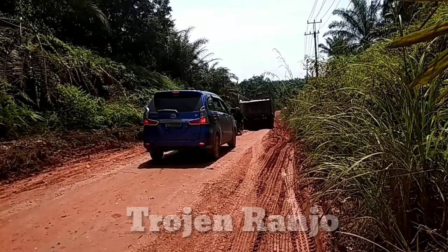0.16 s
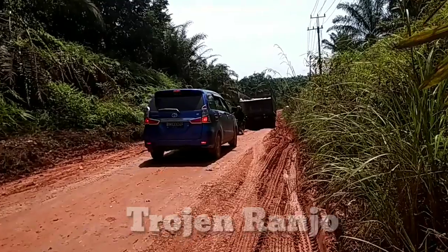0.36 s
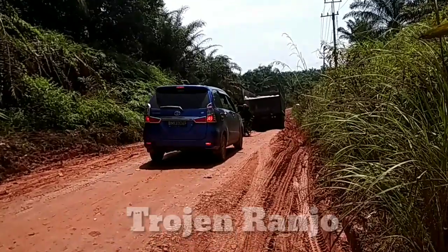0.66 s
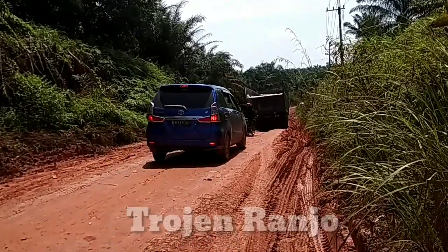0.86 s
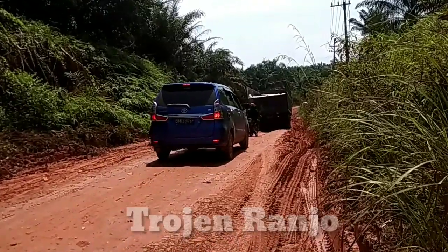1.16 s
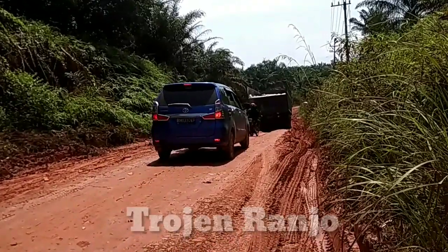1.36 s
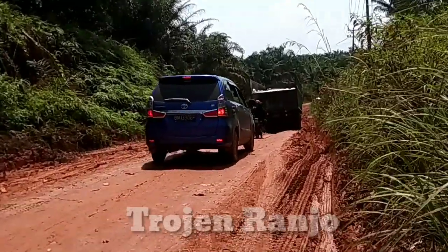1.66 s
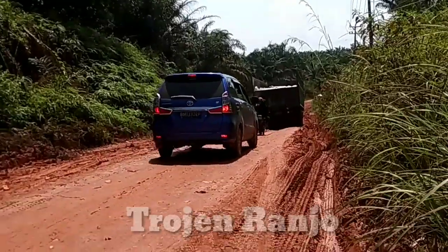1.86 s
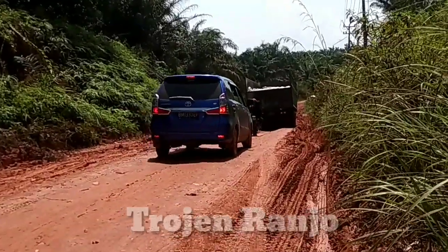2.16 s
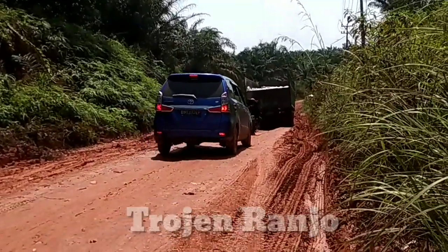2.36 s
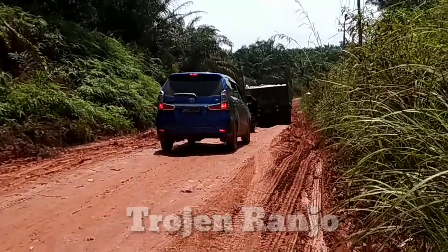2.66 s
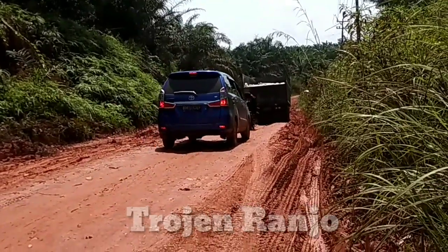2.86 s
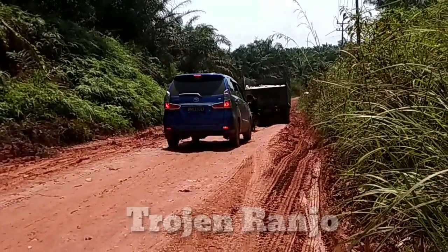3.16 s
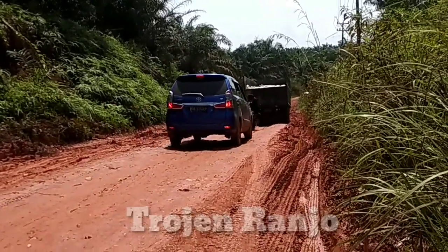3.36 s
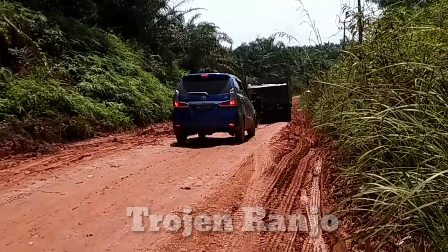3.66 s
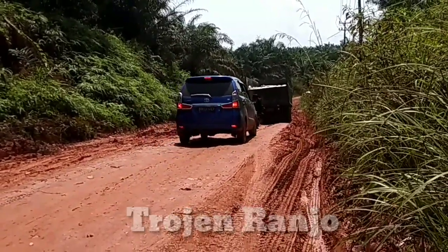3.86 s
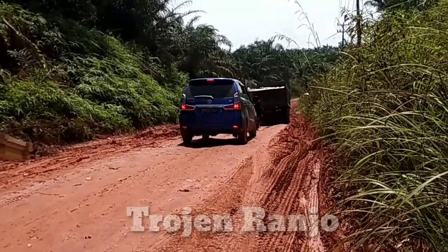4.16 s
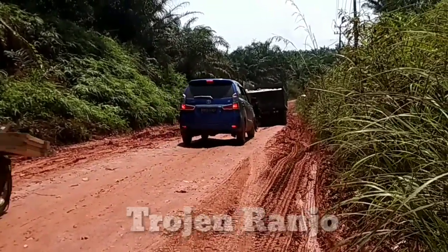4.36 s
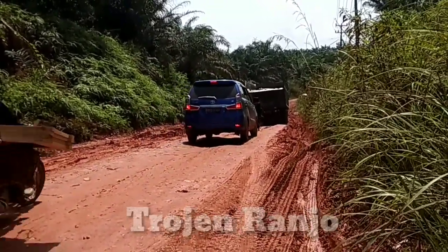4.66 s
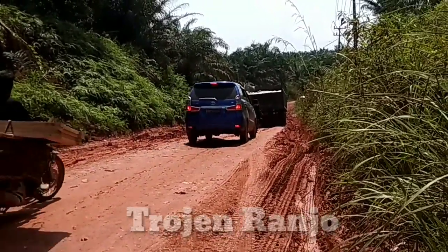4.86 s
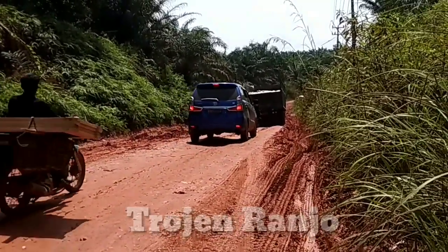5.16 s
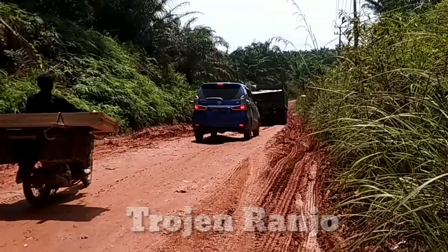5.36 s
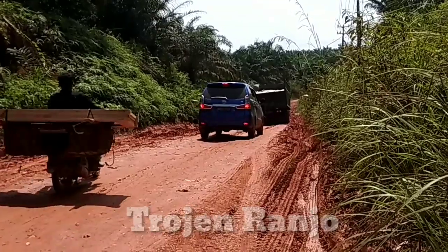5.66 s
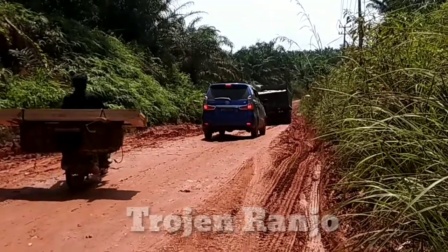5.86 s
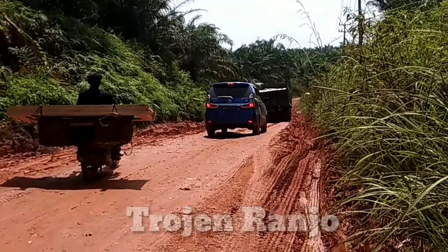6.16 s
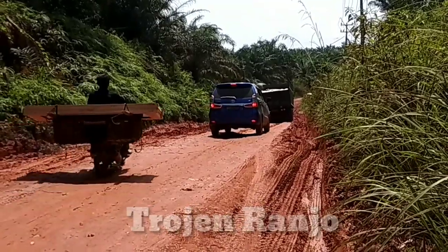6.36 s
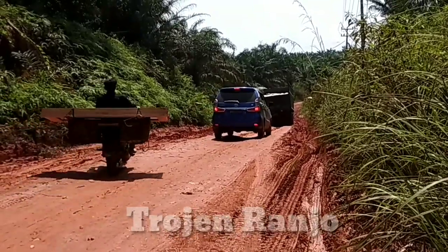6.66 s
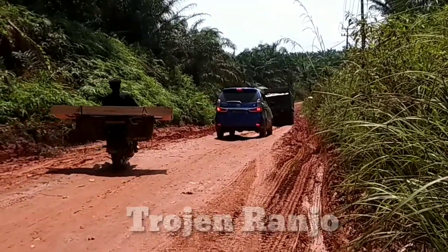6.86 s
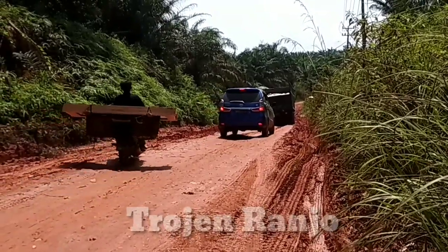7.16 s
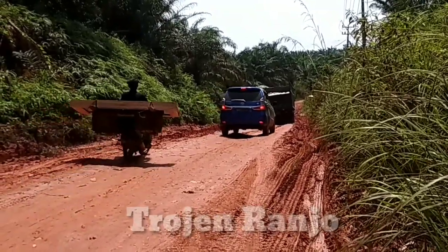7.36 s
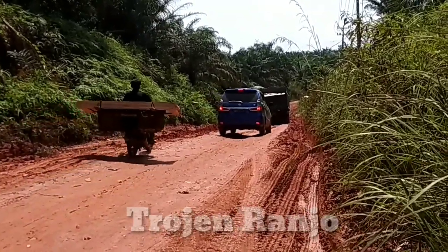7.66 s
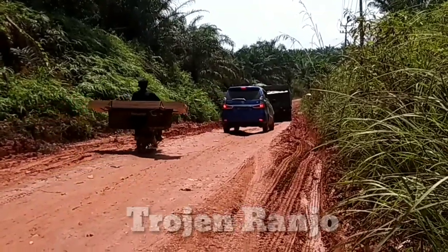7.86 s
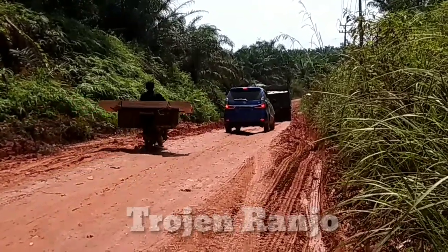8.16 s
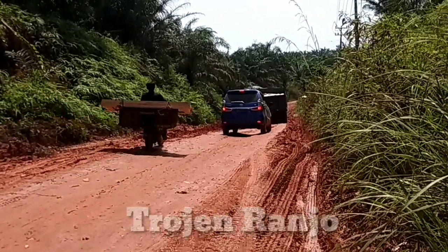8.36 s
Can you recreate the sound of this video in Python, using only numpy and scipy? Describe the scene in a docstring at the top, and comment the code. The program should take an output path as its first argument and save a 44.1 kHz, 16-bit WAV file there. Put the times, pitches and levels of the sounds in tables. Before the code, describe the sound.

Close stereo pickup beside an open dirt track: a lumpy, low-revving motorbike creeps by, slightly to the right at first, then straight ahead. Dry chain hiss, mechanical clatter, short creaks and hoarse squeaks from its bouncing load are loudest in the first seconds. Two quick throttle bursts thud and boom midway, then the idle drops and recedes with fainter scrapes. Steady low truck drone, faint engine whines and gentle wind buffeting lie beneath.

```python
"""Loaded motorbike on a dirt road

A single-cylinder bike crawls past, from beside the microphones to straight ahead, behind a car and a truck.
Firing pulses ring its silencer, with a few twists of the throttle; noise bursts and gliding tones are the
load rubbing and squeaking as it bounces. Noise grains crackle as grit under the tyres.
Wavering sines drone and whine as the engines ahead, over filtered-noise traffic rumble and breeze."""
import sys
import numpy as np
from scipy import signal
from scipy.fft import rfft, irfft, next_fast_len
from scipy.io import wavfile
from scipy.ndimage import uniform_filter1d, map_coordinates

SR = 44100
rng = np.random.default_rng(int(sys.argv[2]) if len(sys.argv) > 2 else 0)


def wrap_up_sound(samples):
    """Save the sound to the file named by the first command line argument, as 16-bit audio."""
    columns = np.atleast_2d(samples).T
    # keep every value between -1 and 1, then stretch to whole-number steps
    tamed = np.clip(columns, -1, 1)
    steps = np.round(tamed * 32767).astype(np.int16)
    wavfile.write(sys.argv[1], SR, steps)


N = 375291
TIME = np.arange(N) / SR

# bike engine speed: time_s, firings_per_s
FIRING_RATE = [(0, 17.85), (.5, 14.32), (1.4, 12.8), (2.5, 13.06), (3.1, 17.01), (3.35, 15.38),
               (3.6, 16.89), (3.84, 15.95), (4.01, 22.91), (4.2, 18.21), (4.45, 14.67), (4.85, 11.65),
               (5.2, 13.21), (5.41, 19.5), (5.7, 15), (6.3, 12.3), (8.5, 11.85)]


def amp(db):
    """Decibels to gain."""
    return 10 ** (np.asarray(db) / 20)


def unit(x):
    """Scales to rms 1."""
    return x / np.sqrt(np.mean(x ** 2) + 1e-20)


def curve(rows):
    """Interpolates a time table at every sample."""
    return np.interp(TIME, *np.transpose(rows))


def read(points, hz):
    """Interpolates a dB spectrum on a log-frequency axis."""
    f, db = np.transpose(points)
    return np.interp(np.log(hz + 1), np.log(f + 1), db)


def bins(size):
    """Bin frequencies of a real spectrum of that many samples."""
    return np.fft.rfftfreq(size, 1 / SR)


def colour(x, points):
    """Zero-phase filter by a dB spectrum."""
    size = next_fast_len(N, real=True)
    return irfft(rfft(x, size) * amp(read(points, bins(size))), size)[..., :N]


def ring(x, points, size=16384):
    """Causal minimum-phase filter: each pulse rings on with this spectrum."""
    log_gain = np.log(amp(read(points, abs(np.fft.fftfreq(size, 1 / SR)))))
    response = np.fft.ifft(np.exp(signal.hilbert(log_gain).conj())).real
    return signal.oaconvolve(x, response[:size // 2])[:N]


def resonate(x, hz, width_hz):
    """Resonance of peak gain 1 that follows a frequency curve."""
    turn = np.exp(2j * np.pi * np.cumsum(hz) / SR)
    r = np.exp(-np.pi * width_hz / SR)
    return 2 * (turn * signal.lfilter([1 - r], [1, -r], x / turn + 1e-18)).real


def wander(knots_per_s):
    """Random curve of rms 1, linear between knots."""
    return unit(np.interp(TIME * knots_per_s, np.arange(4096), rng.standard_normal(4096)))


def add(mix, s, sound):
    """Mixes a sound in at a time in seconds."""
    part = mix[max(round(s * SR), 0):][:len(sound)]
    part += sound[:len(part)]


def spreading_db():
    """Spreading gain along a straight path, 0 dB at the closest point."""
    closest_s, closest_m, speed_m_per_s = 1.61, 2.9, 2.014
    return -20 * np.log10(np.hypot(1, speed_m_per_s * (TIME - closest_s) / closest_m))


def stages():
    """Shares of the bike's front, side and back in what is heard; the side takes whatever front and back leave."""
    coming = curve([(1.9, 0.9), (3.1, 0.26)])
    going = curve([(4.1, 0.18), (4.9, 0.68)])
    return coming, np.clip(1 - coming - going, 0, 1), going


def throttle():
    """Opening from 0 to 1: each twist rises, is held and dies away."""
    # twists: start_s, held_s, opening_0_to_1
    twists = [(0, 0.17, 0.2), (2.3, 0.75, 0.22), (3.551, 0.16, 0.72), (3.85, 0.27, 0.83), (4.34, 0.1, 0.43),
              (5.171, 0.23, 0.15)]
    rise_s, fall_s = 0.035, 0.22
    openings = []
    for s, held_s, opening in twists:
        rise = np.clip((TIME - s) / rise_s, 0, 1)
        fall = np.exp(-np.maximum(TIME - s - held_s, 0) / fall_s)
        openings.append(opening * rise * fall)
    return np.clip(np.max(openings, axis=0), 0, 1)


def engine_cycles():
    """Firing cycles since the start; with the throttle shut the firings stumble early and late."""
    stumble_cycles = 0.025
    steady = np.cumsum(curve(FIRING_RATE)) / SR + .69
    return steady + stumble_cycles * (1 - throttle()) * wander(10)


def exhaust(cycles, lope_db=1.45, boom=1.26, base_db=-34.0, throttle_db=11, rev_db_per_hz=0.49,
            idle_hz=13, falloff=0.64):
    """A pulse and puff of gas per firing ring the silencer; idle lopes, an open throttle thuds and booms."""
    # silencer at idle: frequency_hz, relative_db_per_hz
    idle_shape = [(15, -48.5), (27, -5), (40, 0.5), (51, 8.5), (63, 8.5), (82, -4.5), (113, 5), (135, -4.5),
                  (165, -23.5), (200, -18), (235, -20.5), (275, -31), (340, -29.5), (500, -39),
                  (1500, -57.5)]
    # silencer with open throttle: frequency_hz, relative_db_per_hz
    open_shape = [(15, -17), (30, 1), (48, -2.5), (70, 8.5), (95, 0.5), (125, 7), (160, -11.5), (230, -15),
                  (300, -18.5), (500, -31), (1500, -70)]
    # boom resonance, rising then sinking: time_s, frequency_hz
    boom_hz = [(3.6, 83.54), (3.88, 100), (3.95, 114), (4.0, 117), (4.04, 81.5), (4.15, 73.2), (4.3, 61)]
    uneven_db, gas_share = 1.3, 0.22

    at = np.flatnonzero(np.diff(np.floor(cycles)))
    opened, rate = throttle(), curve(FIRING_RATE)
    level_db = base_db + throttle_db * opened + rev_db_per_hz * (rate - idle_hz) + falloff * spreading_db()

    # strong and weak firings alternate
    strength_db = uneven_db * rng.standard_normal(len(at)) - lope_db * np.cos(np.pi * cycles[at])
    pulses = np.zeros(N)
    pulses[at] = amp(strength_db * (1 - opened[at])) / np.sqrt(rate[at])
    gas = unit(rng.standard_normal(N) * np.exp(-(cycles % 1) / 0.27)) * (1 - opened)
    pulses = pulses + gas_share * np.std(pulses) * gas

    idle = ring(pulses * amp(level_db) * (1 - opened), idle_shape) / np.std(ring(pulses, idle_shape))
    thud = ring(pulses * amp(level_db) * opened, open_shape) / np.std(ring(pulses, open_shape))
    return 1.155 * idle + 0.5 * thud + boom * resonate(thud, curve(boom_hz), 28.0)


def rasp(cycles, full_throttle_db=-47, puff_cycles=0.18):
    """Under load each firing releases a rough, decaying puff of gas."""
    # rasp: frequency_hz, relative_db_per_hz
    rasp_shape = [(150, -27), (350, -6), (600, -2), (950, 1), (1600, -6), (2600, 3), (6000, -32)]
    puffs = rng.standard_normal(N) * np.exp(-(cycles % 1) / puff_cycles)
    return unit(colour(puffs, rasp_shape)) * throttle() ** 3 * amp(full_throttle_db)


def clatter(cycles, beat=0.32, valves=0.8, case_hz=910, case_width_hz=130, case=0.94, base_db=-45.5,
            throttle_db=3, falloff=1.1):
    """Piston noise swells once and valve noise twice a firing and rings the crankcase; colour turns in passing."""
    # engine from the front: frequency_hz, relative_db_per_hz
    front_shape = [(100, -35), (190, 14), (280, -5), (345, 4.5), (450, 4.5), (650, 3.5), (900, 8),
                   (1300, -1.5), (2400, 2), (3500, 0.5), (7000, -29)]
    # engine from the side: frequency_hz, relative_db_per_hz
    side_shape = [(100, 5), (210, 20), (370, 4.5), (700, 9.5), (900, 10), (1300, 11), (1600, 11.5),
                  (2200, 9), (3200, -18), (7000, -54)]
    # engine from behind: frequency_hz, relative_db_per_hz
    back_shape = [(100, -27), (180, -12), (225, 3), (265, 13), (330, 25.5), (520, -40), (750, -4),
                  (950, 17), (1150, -58), (2300, 7), (7000, -59)]

    piston = beat * np.exp(-(cycles % 1) / 0.18)
    valve = valves * np.exp(-((2 * cycles + 0.36) % 1) / 0.19)
    noise = rng.standard_normal((2, N)) * (1 + piston + valve) * amp(2.0 * wander(40))
    level_db = base_db + throttle_db * throttle() + falloff * spreading_db()
    shapes = (front_shape, side_shape, back_shape)
    body = sum(share * colour(noise[0], shape) for share, shape in zip(stages(), shapes))
    crankcase = resonate(noise[1], np.full(N, case_hz), case_width_hz)
    return unit(body + case * crankcase) * amp(level_db)


def rubs(release_s=0.048, sag_db=4, ripple_db=2.5, judder_db=0.94, lift_db=7.0, shift=0.012, glide=0.04,
         snag_db=4.0, snags_per_s=600, snags=0.52, bite=0.48, bite_s=0.015):
    """Bounces scrape the load on the frame in tiny snags; contact slides, so resonances sink in each scrape."""
    # scrapes: start_s, rise_s, length_s, relative_level_db, brightness_db_per_octave
    scrapes = [(0.045, 0.013, 0.1, -51, -0.5), (0.179, .012, 0.26, -50.5, -1.5),
               (0.603, 0.027, 0.09, -46, -0.5), (0.711, 0.014, 0.087, -47.5, -0.5),
               (1.029, 0.041, 0.057, -41.5, 0.5), (1.153, .003, 0.11, -43, -0.9),
               (1.436, 0.043, 0.096, -42, -0.5), (1.61, 0.0057, 0.031, -41, 0.5),
               (1.664, 0.013, 0.1, -44, -1), (1.919, 0.0096, .03, -47.5, -1),
               (2.105, 0.0062, 0.043, -46.5, 2), (2.349, 0.013, .11, -48.5, 1.5),
               (2.587, 0.013, .13, -45, -1), (2.813, .03, 0.14, -48, -1.5),
               (3.044, .013, 0.083, -45.5, 0.5), (3.151, 0.022, 0.08, -50, -0.5),
               (3.613, 0.028, .09, -49.5, -3), (3.835, 0.0059, 0.1, -48, -0.5),
               (4.036, .015, .03, -50.5, -2.5), (4.112, 0.0085, 0.031, -50.5, -4),
               (4.298, 0.037, 0.08, -50, -1), (4.469, 0.018, .025, -48, -1.5),
               (4.561, 0.037, 0.077, -47.5, -1), (4.724, .004, .1, -48, 1),
               (4.992, 0.023, 0.098, -55.5, -3), (5.214, .006, 0.043, -52, -1),
               (5.331, 0.016, 0.046, -58.5, -3), (5.499, 0.0054, 0.025, -53.5, -0.5),
               (5.85, 0.022, 0.056, -55, -2.5), (5.978, 0.012, .075, -54.5, -2),
               (6.177, .005, .02, -63, -5), (6.28, .025, 0.06, -58.5, -2), (6.446, .02, 0.099, -53.5, 0),
               (6.682, .02, 0.14, -59.5, -2), (6.83, 0.031, 0.08, -54.5, -1), (7.085, 0.019, .05, -56, -1),
               (7.197, .025, 0.094, -57, -1.5), (7.34, 0.02, 0.16, -53, -0.5),
               (7.864, .035, 0.054, -57.5, -3), (8.001, 0.0067, 0.059, -57, -2.5),
               (8.09, 0.017, 0.12, -52, .5), (8.218, 0.014, 0.049, -51, 0)]
    # rubbing from the front: frequency_hz, relative_db_per_hz
    front_shape = [(820, -51), (1400, -41), (1930, -7.5), (2510, -4), (3570, -5.5), (4070, -7.5),
                   (4780, -5.5), (5610, -7.5), (7360, -3.5), (7900, -5), (8740, -3.5), (9960, -4),
                   (11200, 2), (13300, -8.5), (15500, -17)]
    # rubbing from behind: frequency_hz, relative_db_per_hz
    back_shape = [(820, -42), (1400, -26), (1640, -10), (1780, -13.5), (2070, -9), (2290, -9), (3570, -5.5),
                  (4070, -6.5), (4680, -6.5), (5730, -2), (6660, -6), (7290, -2), (7980, -4), (11800, -1.5),
                  (15500, -21)]
    # frame resonances: frequency_hz, width_hz, full_lift_db
    frame_modes = [(1850, 250, 5), (2090, 650, 6), (4100, 260, 4.5), (5300, 145, -2.5), (5340, 110, 6),
                   (7460, 230, 6), (10100, 180, 0), (10760, 410, -5)]
    # harder scrapes ring the frame more, between these levels
    ring_from_db, ring_full_db = -61, -50
    # load turns from facing the microphones to facing away
    pass_from_s, pass_length_s = 2.4, 2.1

    out, size = np.zeros(N), 16384
    t, hz = np.arange(size) / SR, bins(size)
    frame_db = sum(lift / (1 + (2 * (hz - f) / width) ** 2) for f, width, lift in frame_modes)
    for s, rise_s, length_s, db, brightness_db in scrapes:
        passed = np.clip((s - pass_from_s) / pass_length_s, 0, 1)
        ripple = uniform_filter1d(rng.standard_normal(len(hz)), size=130)
        ripple = unit(uniform_filter1d(ripple, size=60))
        ringing = np.clip((db - ring_from_db) / (ring_full_db - ring_from_db), 0, 1)
        shifted_db = np.interp(hz * (1 + shift * rng.standard_normal()), hz, frame_db)
        shape_db = (1 - passed) * read(front_shape, hz) + passed * read(back_shape, hz)
        shape_db = shape_db + brightness_db * np.log2(hz + 1) + ringing * shifted_db + ripple_db * ripple

        slips = amp(snag_db * np.minimum(rng.exponential(1, size), 3)) * rng.choice([-1, 1], size)
        slips = slips * (rng.random(size) < snags_per_s / SR)
        source = rng.standard_normal(size) + snags * unit(slips)
        scrape = unit(irfft(rfft(source) * amp(shape_db)))
        slid = np.minimum(t / length_s, 1)
        # playback slows as contact slides: pitch sinks
        scrape = map_coordinates(scrape, [np.cumsum(1 + glide * (.5 - slid))], order=3)

        pressure = np.minimum(t / rise_s, 1) * (1 + bite * np.exp(-t / bite_s))
        pressure = pressure * amp(-sag_db * slid) * np.exp(-np.maximum(t - length_s, 0) / release_s)
        add(out, s, amp(db + lift_db) * pressure * scrape)
    return out * amp(judder_db * wander(110))


def squeaks(width_hz=170, octave_db=-8):
    """Stick and slip in the springs: a hoarse gliding whistle with its octave."""
    # whistles: start_s, length_s, first_hz, last_hz, fundamental_db
    whistles = [(0.032, 0.075, 5520, 4800, -44.5), (0.171, 0.023, 2800, 3330, -42),
                (0.191, 0.064, 3390, 2510, -44), (0.601, 0.044, 4760, 4470, -49),
                (0.709, 0.042, 2450, 2635, -43), (1.012, 0.036, 4700, 4330, -47.5),
                (1.44, 0.02, 4650, 4184, -43.5), (1.472, 0.024, 4150, 4100, -49),
                (1.616, 0.027, 2100, 2100, -41.5), (2.218, 0.071, 5000, 4120, -52),
                (3.532, 0.05, 4180, 4160, -47), (3.843, 0.053, 3300, 1730, -46),
                (4.58, 0.03, 6000, 6000, -47), (4.718, 0.083, 5660, 5480, -50),
                (7.375, 0.057, 2650, 2560, -56), (8.088, 0.028, 5500, 5280, -48)]
    out = np.zeros(N)
    for s, length_s, first_hz, last_hz, db in whistles:
        size = int(length_s * SR)
        slips = rng.standard_normal(SR // 4)[:size] * np.sqrt(2 * np.pi * abs(width_hz) / SR)
        glide = 2 * np.pi * np.linspace(first_hz, last_hz, size) / SR
        phase = np.cumsum(glide + uniform_filter1d(slips, size=16))
        tone = np.sin(phase) + amp(octave_db) * np.sin(2 * phase)
        add(out, s, amp(db) * np.sqrt(2) * signal.windows.tukey(size, .6) * tone)
    return out


def thumps():
    """The wooden cargo lands on its rack and rings briefly in decaying modes."""
    # landings: start_s, relative_level_db
    landings = [(1.551, -11), (1.578, -2), (1.593, -24)]
    # cargo modes: frequency_hz, relative_level_db, t60_s
    cargo_modes = [(183, -28, 0.047), (283, -31, 0.06), (385, -33, 0.051), (422, -27, 0.063),
                   (900, -31, 0.026), (950, -41, 0.03), (1800, -48, 0.04), (2385, -34, 0.037)]
    out, t = np.zeros(N), np.arange(SR // 4) / SR
    wood = sum(amp(db - 60 * t / t60_s) * np.sin(2 * np.pi * hz * t) for hz, db, t60_s in cargo_modes)
    for s, db in landings:
        add(out, s, amp(db) * wood)
    return out


def knocks():
    """Dying noise bursts: low from the exhaust's barks and the cargo's knock, high from small stones."""
    # bursts: start_s, initial_rms_db, centre_hz, width_octaves (standard deviation), decay_s
    bursts = [(1.577, -30, 750, 1.1, 0.0057), (2.044, -30, 12000, 0.42, 0.0028),
              (3.877, -38, 2300, 0.57, 0.005), (3.889, -39.5, 650, 1.5, 0.015),
              (3.939, -30.5, 750, 1.77, 0.011), (3.978, -45, 1300, 0.6, 0.076),
              (5.733, -34.5, 11000, 0.91, 0.0013)]
    out, size = np.zeros(N), 4096
    t, hz = np.arange(size) / SR, bins(size)
    for s, db, centre_hz, octaves, decay_s in bursts:
        band = np.exp(-.5 * (np.log2((hz + 1) / centre_hz) / octaves) ** 2)
        noise = unit(irfft(rfft(rng.standard_normal(size)) * band))
        add(out, s, amp(db) * noise * np.exp(-t / decay_s))
    return out


def chain_and_tyres(grains_per_s=500, grain_db=7.0, grit=0.51, base_db=-47.0, falloff=0.67):
    """Dry chain hiss with grains of grit crushed by the tyres, duller as the bike goes by."""
    # chain and grit: frequency_hz, relative_db_per_hz
    chain_shape = [(600, 4), (1500, 4.5), (2400, 3.5), (3300, 3), (5000, 2), (7000, -2), (9000, 2),
                   (11000, 3.5), (12300, 1), (13500, 0.5), (15500, -39)]
    # treble loss with distance: frequency_hz, gain_db
    far_gain = [(1000, 2.5), (5000, 2.5), (11500, -3), (13500, -8), (15500, -29)]
    sizes = amp(grain_db * np.minimum(rng.exponential(1, N), 4)) * rng.choice([-1, 1], N)
    grains = unit(sizes * (rng.random(N) < grains_per_s / SR))
    hiss = (rng.standard_normal(N) + grit * grains) * amp(0.19 * wander(69))
    near = unit(colour(hiss, chain_shape))
    coming = stages()[0]
    mixed = coming * near + (1 - coming) * colour(near, far_gain)
    return mixed * amp(base_db + falloff * spreading_db())


def gravel(pops_per_s=70, size_db=5.5, low_hz=1100, high_hz=5200, ring_cycles=2.5, count=24):
    """Stones under the tyres each snap with a few cycles of their own pitch."""
    # popping: time_s, level_db
    pop_level = [(0, -48), (2.5, -71), (2.95, -48.5), (3.4, -58.5), (4.0, -57), (4.6, -65), (8.5, -81)]
    out, t = np.zeros(N), np.arange(512) / SR
    sizes = amp(size_db * np.minimum(rng.exponential(1, N), 3)) * (rng.random(N) < pops_per_s / SR)
    stone = rng.integers(0, count, N)
    for k, hz in enumerate(np.geomspace(low_hz, high_hz, count)):
        snap = np.sin(2 * np.pi * hz * t) * np.exp(-hz * t / ring_cycles)
        for at in np.flatnonzero(sizes * (stone == k)):
            add(out, at / SR, sizes[at] * snap)
    return unit(out) * amp(curve(pop_level))


def place(x, scatter, t60_s, turns_per_s=16, count=2):
    """Bike sound reaches the right port first; the leaves that scatter it back change as it moves."""
    # left port's lag, bike square to the side and straight ahead
    side_lag_ms, ahead_lag_ms = 0.459, -0.042
    lag_ms = ahead_lag_ms + (side_lag_ms - ahead_lag_ms) * amp(spreading_db())
    lag = lag_ms * SR / 1000  # samples
    direct = np.array([map_coordinates(x, [np.arange(N) - side * lag / 2], order=3) for side in (1, -1)])
    t = np.arange(SR // 8) / SR
    echo = 0
    for k in range(count):
        tail = rng.standard_normal((2, len(t))) * amp(-60 * t / t60_s) * (t > .002)
        tail /= np.linalg.norm(tail, axis=1, keepdims=True)
        # the tails take turns, crossfading
        share = np.sin(np.pi / 2 * np.minimum((turns_per_s * TIME + k) % count, 2))
        echo = echo + signal.oaconvolve((x * share)[None], tail, axes=1)[:, :N]
    return (direct + scatter * echo) / np.hypot(1, scatter)


def truck(waver_db=-0.5, drift=0.0124, rumble_db=-45):
    """Drifting firing note with overtones from up the road, over the noise rumble of slow traffic."""
    # firing note: time_s, pitch_hz
    note_hz = [(0, 46.65), (0.7, 47.27), (1.5, 49.96), (2.1, 49.02), (2.7, 51.12), (3.2, 48.02),
               (4.1, 48.99), (5.7, 47.56), (6.8, 48.65), (7.2, 47.65), (7.7, 49.32), (8.5, 47.7)]
    # note level: time_s, level_db
    note_db = [(0, -42), (1.5, -43), (2.5, -41), (3.6, -42), (4.8, -46), (5.3, -39), (5.9, -42), (7, -40.5),
               (8.5, -41)]
    # harmonics: multiple, relative_level_db
    orders = [(1, 4.5), (2, -36), (3, -18)]
    # slow traffic: frequency_hz, relative_db_per_hz
    rumble_shape = [(8, -27), (25, -11), (45, -29), (75, 0.5), (125, 1), (170, -3.5), (330, -14),
                    (520, -16.5), (800, -21.5), (2000, -41.5)]
    hz = curve(note_hz) * (1 + drift * wander(3) + 0.0083 * wander(15))
    phase = 2 * np.pi * np.cumsum(hz) / SR
    note = sum(amp(db + waver_db * wander(14)) * np.sin(round(k) * phase + 2 * np.pi * rng.random())
               for k, db in orders)
    # mostly common to both ports
    noise = rng.standard_normal(N) + 0.043 * rng.standard_normal((2, N))
    rumble = unit(colour(noise, rumble_shape))
    return np.sqrt(2) * note * amp(curve(note_db)) + amp(rumble_db) * rumble


def whines(drift=0.01222, waver_db=1.5):
    """Faint, rough engine notes of the traffic ahead: sines wavering in pitch and level."""
    # notes: start_s, length_s, first_hz, last_hz, level_db
    notes = [(0, 2.27, 339, 345, -59.5), (0.7, 1.1, 634, 566, -63), (0.66, 1.5, 547, 465, -61),
             (0, 8.5, 205.1, 200.4, -58), (5, 0.74, 226, 232, -53), (5, 2.84, 155, 158, -63.5),
             (7, 2.83, 231, 210, -59.5), (5.5, 3.5, 326.7, 319.3, -64.5)]
    rough_share, flutter_db = 0.035, 3
    out = np.zeros(N)
    for s, length_s, first_hz, last_hz, db in notes:
        along = np.clip((TIME - s) / length_s, 0, 1)
        rough_hz = rough_share * first_hz * wander(70)
        hz = (first_hz + (last_hz - first_hz) * along) * (1 + drift * wander(7)) + rough_hz
        fade = np.minimum(10 * np.minimum(along, 1 - along), 1)
        level = amp(db + waver_db * wander(6) + flutter_db * wander(25))
        out += np.sqrt(2) * fade * level * np.sin(2 * np.pi * np.cumsum(hz) / SR)
    return out


def breeze(level_db=-48):
    """Soft low buffeting: independent noise at each port, swelling together."""
    # buffeting: frequency_hz, relative_db_per_hz
    breeze_shape = [(10, -5), (28, 0), (60, -10), (120, -17), (300, -52), (1000, -75)]
    gust_db = 3
    return amp(level_db + gust_db * wander(1.99)) * unit(colour(rng.standard_normal((2, N)), breeze_shape))


def scene():
    """Bike sounds, placed in four groups, pass the microphones over traffic and breeze."""
    cycles = engine_cycles()
    low = place(exhaust(cycles), scatter=0.012, t60_s=0.36)
    middle = place(clatter(cycles) + rasp(cycles), scatter=0.5, t60_s=0.17)
    high = place(chain_and_tyres() + rubs(), scatter=1.0, t60_s=0.037, count=4)
    short = place(knocks() + thumps() + squeaks() + gravel(), scatter=0.69, t60_s=0.058)
    return low + middle + high + short + truck() + whines() + breeze()


def record(dry):
    """The two ports colour the sound oppositely; then a low-pass limits the band."""
    # microphone colour: frequency_hz, left_minus_right_db
    port_tilt = [(60, -0.5), (380, -0.5), (700, 1), (1290, 4), (2380, 2.5), (4400, -3.5), (8120, -2),
                 (15000, 1.5)]
    edge_hz = 15500
    ports = np.array([colour(x, [(f, side * db / 2) for f, db in port_tilt])
                      for x, side in zip(dry, (1, -1))])
    low_pass = signal.firwin(511, edge_hz, window=("kaiser", 9), fs=SR)
    return signal.oaconvolve(ports, low_pass[None], "same")


dry = scene()
out = record(dry)
wrap_up_sound(out)
```